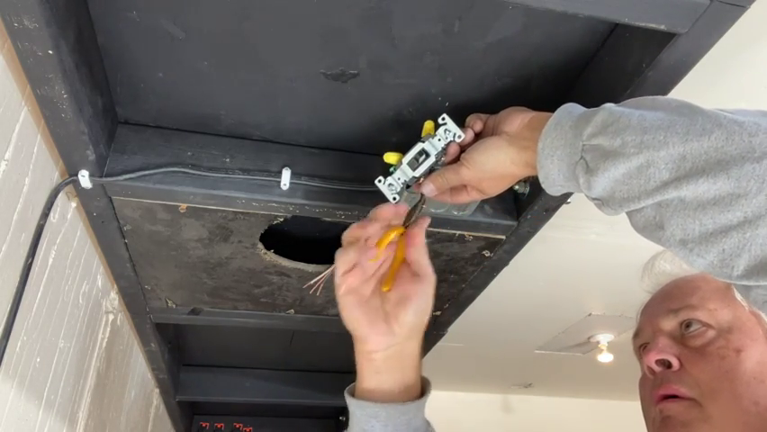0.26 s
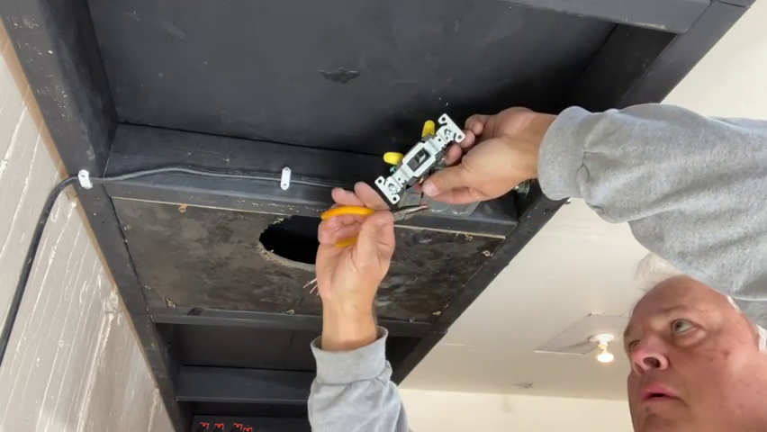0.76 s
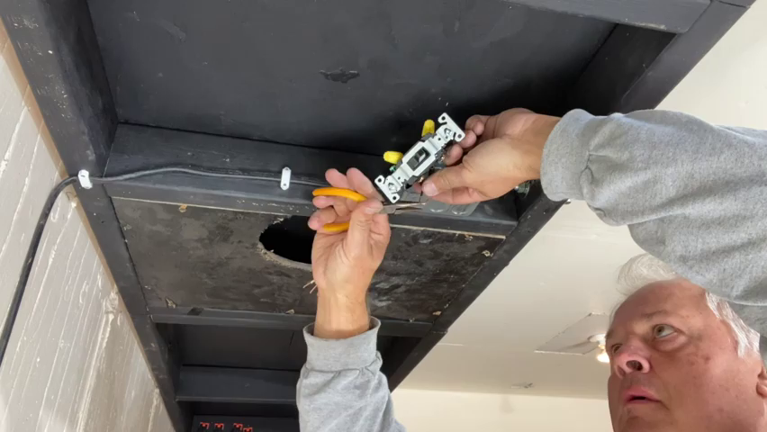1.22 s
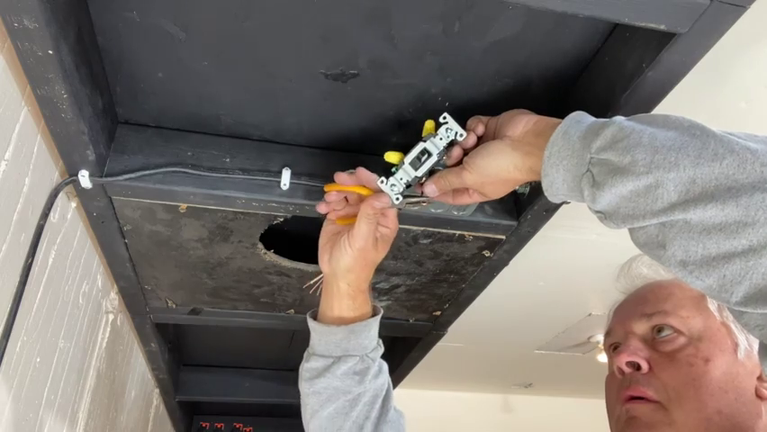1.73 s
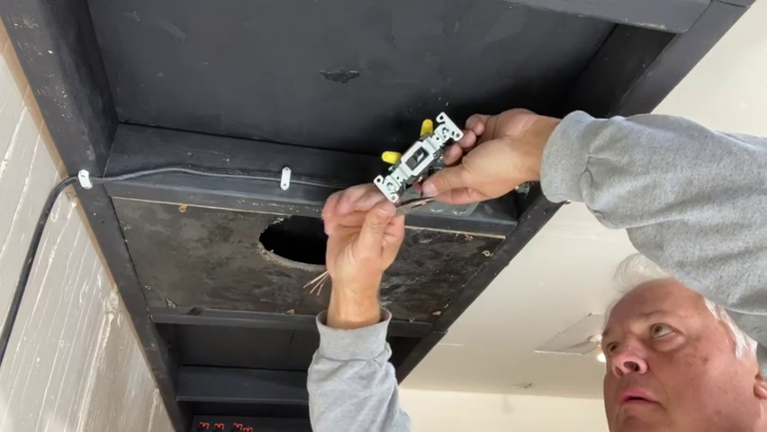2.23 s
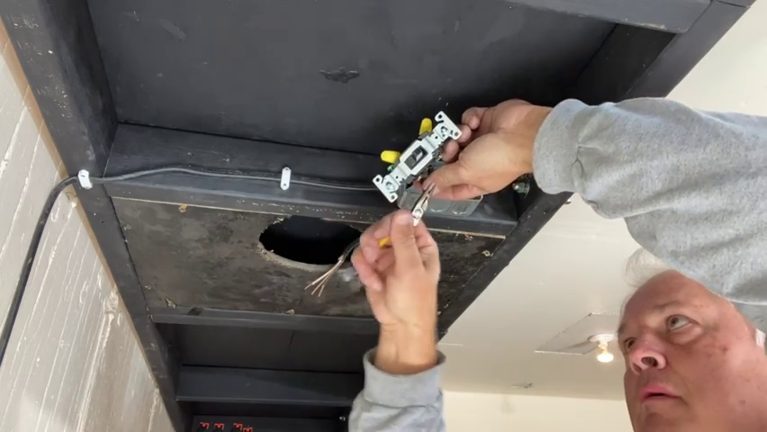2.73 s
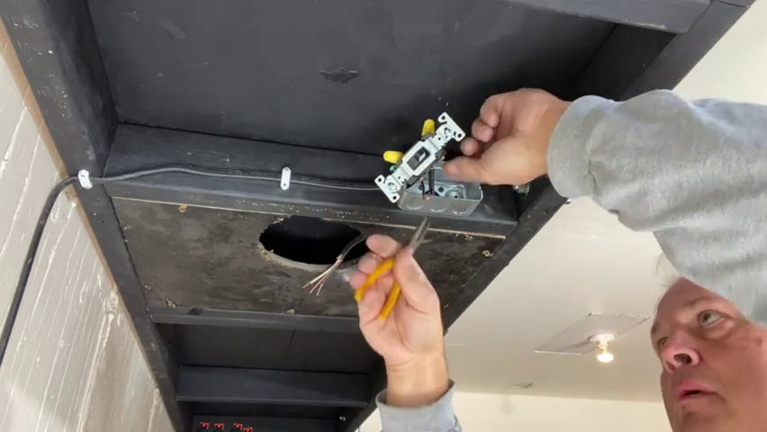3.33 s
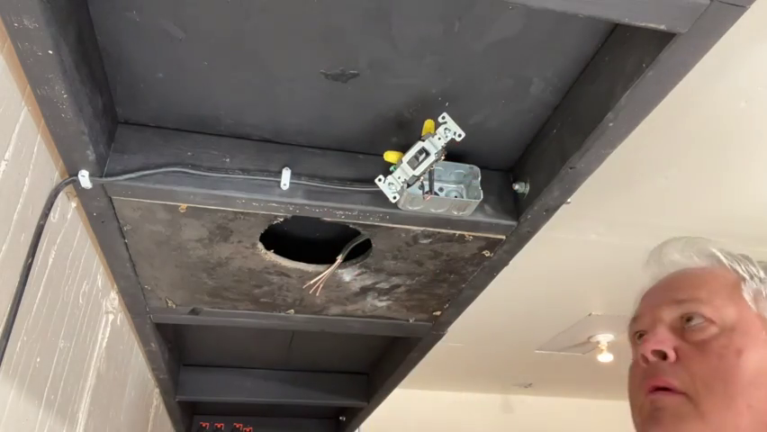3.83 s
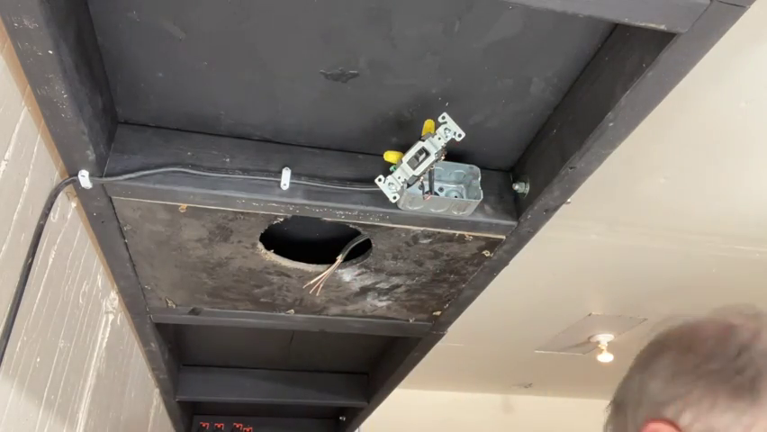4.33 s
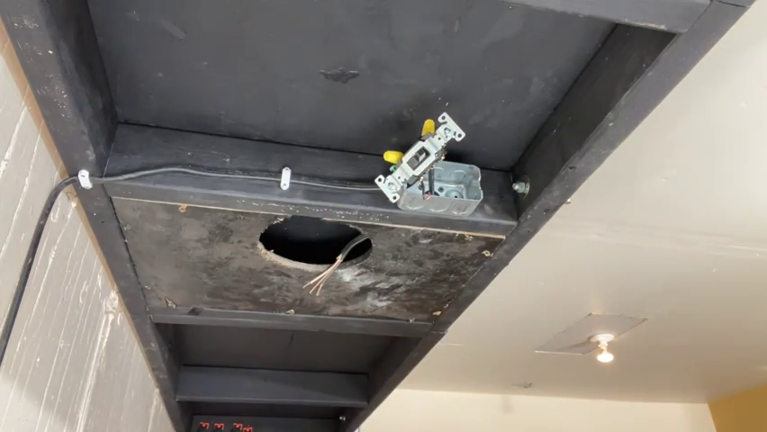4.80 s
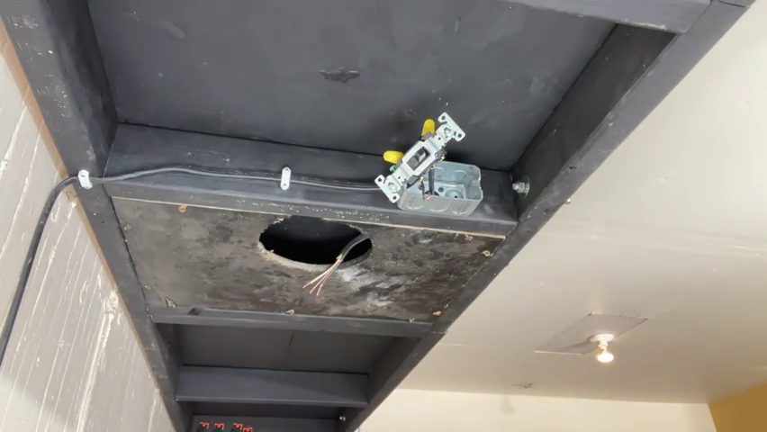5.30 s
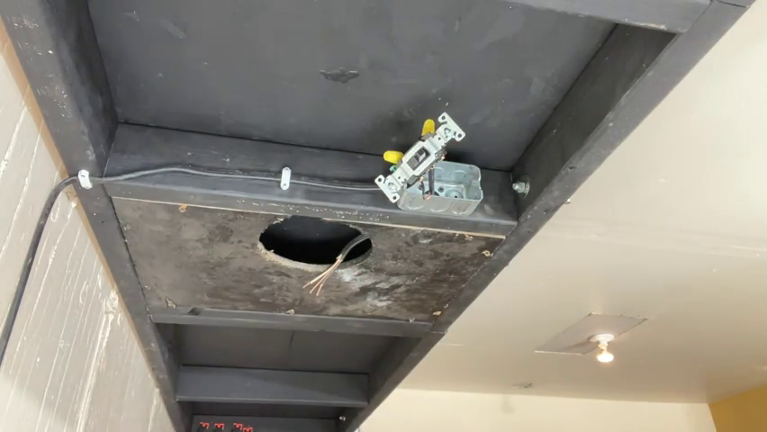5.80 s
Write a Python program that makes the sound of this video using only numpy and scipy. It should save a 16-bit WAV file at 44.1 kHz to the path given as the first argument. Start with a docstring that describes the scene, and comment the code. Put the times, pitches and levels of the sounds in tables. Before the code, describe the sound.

Small clicks and scrapes of wire on a switch, with dull panel thumps, followed by scuffing shoes and a loud hollow clatter indoors.

```python
"""Small ticks, scrapes and clinks: pliers work a copper wire onto the terminals of a light switch.
It hangs from a steel box under a ceiling panel, which thumps when the cable is tugged.
Then shoes and clothes scuff, something squeaks faintly, and across the bare room the tool is put down
on a hollow surface with a loud clatter. A stereo microphone hears the switch with little echo,
the shoes and the rattle with much more, all over the low rumble of a quiet house."""
import sys
import numpy as np
from scipy import signal
from scipy.fft import rfft, irfft, next_fast_len
from scipy.io import wavfile
from scipy.ndimage import uniform_filter1d

SR = 44100
rng = np.random.default_rng(int(sys.argv[2]) if len(sys.argv) > 2 else 0)


def bounce(signal):
    """Save signal as a 16-bit WAV file at the path given by the first command-line argument."""
    frames = np.transpose(np.atleast_2d(signal))
    limited = np.clip(frames, -1, 1)
    pcm = np.round(limited * 32767).astype(np.int16)
    wavfile.write(sys.argv[1], SR, pcm)


N = 266893
SPAN = 32768   # samples given to one event
AGE = np.arange(SPAN) / SR   # seconds since the event began

# Levels in the tables are relative: each source adds its own gain.
# the pliers touch the switch: start_s, tick_db, clink_db, knock_db
TOUCHES = [(0.113, -74, -63, -52), (0.258, -52.5, -53, -35.5), (0.302, -49, -61, -31),
           (0.333, -41.5, -52.5, -40), (0.824, -57, -60.5, -52.5), (0.928, -75, -69, -51),
           (0.992, -46.5, -59, -50), (1.071, -59, -62, -48.5), (1.185, -76, -67.5, -49.5),
           (1.343, -46, -42.5, -44.5), (1.592, -50.5, -61, -53), (1.765, -65, -62.5, -47),
           (1.94, -44.5, -50, -37), (2.178, -63.5, -62, -52), (2.413, -53, -61, -80),
           (2.666, -69, -74.5, -54.5), (2.939, -35, -51, -40.5), (3.020, -30.5, -37.5, -30.5),
           (3.042, -39, -42.5, -48)]
# the wire drags along the terminals: start_s, length_s, level_db, scratch_over_rub_db
DRAGS = [(0.129, 0.25, -54.5, -28), (0.262, 0.12, -41.5, -18.5), (0.984, 0.11, -52, -22.5),
         (1.346, 0.074, -55.5, -16.5), (1.691, 0.19, -53, -44), (1.905, 0.14, -58.5, 13),
         (2.956, 0.13, -44.5, -11.5), (3.031, 0.03, -41.5, -8)]
# modes of the switch frame: pitch_hz, level_db, t60_s
FRAME_MODES = [(1130, -5, .04), (1225, -2, .08), (1320, 0, .05), (1432, -1, .06), (2514, -11, .1),
               (2620, -12, .05), (3068, -16, .05), (3750, -19, .04), (4043, -18, .05)]
# bright spectrum of copper on a screw: frequency_hz, level_db
WIRE_COLOUR = [(300, -45), (1500, 1.5), (2800, 10), (4000, 15), (5200, 16), (6500, 9), (8300, 12.5),
               (11000, 13.5), (16000, -4)]


def switch_clinks(tails, level_db=4.0, ring_db=-0.5, travel_s=0.00195):
    """Each touch travels from the wire to the hand-damped frame, which clinks briefly."""
    # spectrum of the frame's dense modes: frequency_hz, level_db
    clink_colour = [(200, -9), (800, -22.5), (1100, -0.5), (1330, -6), (1650, -18.5), (2100, -11),
                    (2550, -32.5), (3000, -17.5), (3900, -19), (5000, -25), (10000, -58)]
    out = np.zeros((2, N))
    for s, _, db, _ in TOUCHES:
        ring = from_db(ring_db) * struck(FRAME_MODES, vary_db=2.0, spread=.8, detune=.02)
        frame = dense_modes(clink_colour, t60=0.107, rise_s=0.0081) + ring
        add(out, s + travel_s, from_db(db + level_db) * in_room(frame, tails, wet_db=-10.0))
    return out


def wire_ticks(tails, level_db=-6.0, catches_per_s=25, catch_spread_db=2.0):
    """The wire ticks when touched, when it snaps over a screw and when it catches during a drag."""
    # snaps over a screw head: start_s, level_db
    snaps = [(0.282, -46), (0.349, -43.5), (1.906, -52.5), (1.921, -44.5), (1.999, -34.5), (2.012, -41),
             (2.019, -33.5), (2.058, -34.5)]
    ticks = [(s, db) for s, db, _, _ in TOUCHES] + list(snaps)
    for s, length, db, scratch_db in DRAGS:
        waits = rng.uniform(.3, 1.7, 12) / catches_per_s
        levels = db + scratch_db + catch_spread_db * rng.standard_normal(12)
        ticks += [(s + age, level) for age, level in zip(np.cumsum(waits), levels) if age < length]
    crack_and_buzz = fade(.014) + from_db(-14) * fade(.08)
    out = np.zeros((2, N))
    for s, db in ticks:
        tick = noise(varied(WIRE_COLOUR, vary_db=5.5)) * crack_and_buzz
        add(out, s, from_db(db + level_db) * in_room(tick, tails, wet_db=-14.0))
    return out


def wire_scrapes(tails, sing_db=7.5, held_t60_s=.08):
    """Copper drags over the screws in uneven slips; its bright scratch sets the held frame singing."""
    # spectrum of the dull rub: frequency_hz, level_db
    rub_colour = [(40, -40), (130, 10), (300, 11.5), (550, 11), (850, -3.5), (1300, -2.5), (1700, -12.5),
                  (2300, -11.5), (2550, -16), (2850, -19), (4000, -17), (8000, -28)]
    out = np.zeros((2, N))
    for s, length, db, scratch_db in DRAGS:
        stroke = (1 - fade(.015)) * np.sqrt(np.clip(1 - (AGE / length) ** 2, 0, 1))
        slips = grit(rough_db=3.0) * stroke
        scratch = noise(WIRE_COLOUR) * slips
        held_frame = struck(FRAME_MODES, vary_db=0.0, spread=0.91) * fade(held_t60_s)
        singing = signal.fftconvolve(scratch, held_frame, axes=1)[:, :SPAN]
        metal = unit_crest(scratch) + from_db(sing_db) * unit_crest(singing)
        scrape = unit_crest(noise(rub_colour) * slips) + from_db(scratch_db) * metal
        add(out, s, from_db(db) * in_room(scrape, tails, wet_db=-8.5))
    return out


def cable_jolts(travel_s=0.00604, spring_back_s=.027, usual_tug_db=-29, hardening=0.81):
    """Touches, tugs and the cable's soft spring back jolt the panel: start_s, level_db, hardness_db."""
    # the hand tugs the cable: start_s, level_db
    tugs = [(0.123, -34.5), (0.183, -32.5), (0.266, -29), (1.373, -45.5), (1.942, -22.5), (2.031, -42),
            (2.136, -40.5), (2.959, -27)]
    jolts = [(s + travel_s, db + 1.5, -1.5) for s, _, _, db in TOUCHES]
    for s, db in tugs:
        jolts.append((s, db, -14 + hardening * (db - usual_tug_db)))   # a stronger tug is harder
        jolts.append((s + spring_back_s, db - 2.5, -54))
    return jolts


def ceiling_panel(tails, boom_db=-8.0, knock_db=-9.5, ring_db=4.0, softness=0.61):
    """Overhead, the panel booms and knocks at each jolt; a soft one moves mainly a single low mode."""
    # the panel's low and middle modes: pitch_hz, level_db, t60_s
    boom_modes = [(85, -22, .2), (135, 0, .22), (178, -6, .1), (228, 1, .14), (305, -1, .18),
                  (362, -4, .15)]
    knock_modes = [(410, -5, .08), (503, -1, .13), (565, 0, .16), (640, -6, .06), (754, -6, .1),
                   (860, -10, .08)]
    # spectrum of its dense modes: frequency_hz, level_db
    knock_colour = [(100, -16), (220, -3), (380, -7), (560, -5.5), (800, -11), (1100, -29), (2500, -41)]
    main_hz = boom_modes[1][0]
    out = np.zeros((2, N))
    for s, db, hardness_db in cable_jolts():
        modes = favoured(boom_modes, main_hz, slope_db=-softness * hardness_db)
        boom = in_room(struck(modes, vary_db=1.5, spread=.1), tails, wet_db=-14.0)
        wood = dense_modes(knock_colour, t60=0.17, rise_s=0.089)
        ring = from_db(ring_db) * struck(knock_modes, vary_db=1, spread=0.68)
        knock = in_room(wood + ring, tails, wet_db=-9.0)
        add(out, s, from_db(db + boom_db) * boom + from_db(db + hardness_db + knock_db) * knock)
    return out * pan(left_db=1.6)


def tool_blows(other_end_db=-2.5):
    """Each landing is two blows, one per end of the tool: start_s, level_db, rattle_db, pitch_hz."""
    # the tool lands: start_s, level_db, rattle_db, pitch_hz, other_end_after_s
    landings = [(4.084, -51, -63, 850, .02), (4.974, -17, -31.5, 780, .01), (5.003, -10.5, -25, 970, .011),
                (5.085, -13.5, -20, 794, .01), (5.119, -18, -36.5, 450, .008),
                (5.253, -8.5, -27, 734, .005), (5.511, -40.5, -66, 895, .015),
                (5.555, -35.5, -62, 870, .003)]
    for s, db, rattle_db, pitch_hz, gap_s in landings:
        yield s, db, rattle_db, pitch_hz
        yield s + gap_s, db + other_end_db, rattle_db + other_end_db, pitch_hz


def tool_clatter(tails, body_db=-0.5, ring_db=-3.0, usual_blow_db=-14.5, usual_thud_db=-30.5):
    """Across the room the tool lands, tips and settles: the surface rings and thuds, the jaws rattle."""
    # the hollow surface's low and middle modes: pitch_hz, level_db, t60_s
    thud_modes = [(125, -4.5, 0.14), (166, -6, 0.31), (173, 3.5, .1), (200.7, -8.5, 0.32), (232, 12, 0.028),
                  (298, 6, 0.087)]
    ring_modes = [(371, -3, .18), (449, -2, .18), (549, -5, .22), (732, -3, .2), (800, -3, .15),
                  (871, -4, .18), (955, -5, .12), (1225, -11, .13)]
    # spectra of the surface's knock and of the steel jaws: frequency_hz, level_db
    knock_colour = [(30, -66.5), (100, -32), (280, -7.5), (450, 2.5), (620, -11.5), (760, 7.5),
                    (930, -12.5), (1100, -8), (1350, -14.5), (1700, -19.5), (5000, -47)]
    jaw_colour = [(30, -56), (500, -5.5), (1100, 1), (1450, 3.5), (1850, 7.5), (2500, 5.5), (3300, -1),
                  (4300, -4), (5400, -3), (6300, -3.5), (7200, -20), (9000, -10), (11000, -15.5),
                  (16000, -25)]
    out = np.zeros((2, N))
    for s, db, rattle_db, pitch_hz in tool_blows():
        knock = dense_modes(favoured(knock_colour, pitch_hz, slope_db=12.0), t60=.05, rise_s=.006)
        ring = struck(favoured(ring_modes, pitch_hz, slope_db=4.0), vary_db=1.5, spread=.9, detune=.002)
        body = in_room(knock + from_db(ring_db) * ring, tails, wet_db=-6.5, lag_ms=0.25)
        thud = struck(thud_modes, vary_db=1.5, spread=.2) * (1 - fade(.03)) ** 3 * pan(left_db=1.7)
        thud_db = usual_thud_db + 0.78 * (db - usual_blow_db)   # the thud follows the force
        rattle = dense_modes(jaw_colour, t60=.08, rise_s=.007, vary_db=1.5) * grit(rough_db=3.0)
        add(out, s, from_db(db + body_db) * body)
        add(out, s, from_db(thud_db) * in_room(thud, tails, wet_db=-13.5))
        add(out, s, from_db(rattle_db) * in_room(rattle, tails, wet_db=0.0) * pan(left_db=-1.1))
    return out


def shoe_scuffs(tails, level_db=4.5, tilt_db_per_octave=1.2, sole_t60_s=.13, heel_t60_s=.1):
    """The heel taps and the sole rubs the floor: a gritty hiss that swells, holds and dies away."""
    # the shoes meet the floor: start_s, sole_db, rise_s, hold_s, heel_db
    steps = [(3.686, -48.5, 0.004, 0.021, -61), (4.166, -48.5, 0.023, .02, -70),
             (4.312, -47, 0.0051, .015, -66), (4.489, -71.5, 0.0023, .003, -60),
             (4.7763, -52.5, 0.0059, 0.0085, -43.5), (5.469, -60.5, 0.027, .01, -70)]
    # spectrum of shoe on floor, before the tilt: frequency_hz, level_db
    shoe_colour = [(50, -28), (170, -13), (400, -1.5), (900, -3.5), (1300, -2), (1950, 1), (3000, -5.5),
                   (5500, -11), (7200, -26), (9000, -24), (11000, -25.5), (16000, -34)]
    colour = [(hz, db + tilt_db_per_octave * np.log2(hz)) for hz, db in shoe_colour]
    out = np.zeros((2, N))
    for s, sole_db, rise, hold, heel_db in steps:
        release = np.interp(AGE - rise - hold, AGE, fade(sole_t60_s))
        stroke = np.minimum(AGE / rise, 1) * release
        rub = noise(colour) * grit(rough_db=4.5) * stroke
        add(out, s, from_db(sole_db + level_db) * in_room(rub, tails, wet_db=0.5))
        tap = noise(colour) * fade(heel_t60_s)
        add(out, s, from_db(heel_db + level_db) * in_room(tap, tails, wet_db=-8.5))
    return out * pan(left_db=-0.5)


def clothes(level_db=3.5, ease_s=0.044):
    """Cloth slides on cloth: a fine hiss that follows each movement and catches on the folds."""
    # one loudness curve per movement: time_s, level_db
    movements = [
        [(3.6, -77), (3.71, -73), (3.84, -58), (4.182, -77.5), (4.37, -80.5), (4.618, -64.5), (4.836, -55),
         (4.97, -55.5)],
        [(5.78, -82.5), (5.876, -67.5), (6.01, -64), (6.04, -74.5)],
    ]
    # spectrum of the rustle: frequency_hz, level_db
    cloth_colour = [(150, -35.5), (250, -0.5), (414, -0.5), (640, -7), (788, -1.5), (1200, -7), (1530, -1),
                    (2200, -5.5), (2760, -5.5), (4990, -9), (10900, -22.5), (12500, -50.5), (14200, -27),
                    (16000, -37)]
    t, level = np.arange(N) / SR, np.zeros(N)
    for curve in movements:
        s, db = np.transpose(curve)
        outside_s = np.abs(t - np.clip(t, s[0], s[-1]))
        level += from_db(level_db + np.interp(t, s, db)) * np.exp(-outside_s / ease_s)
    folds = grit(rough_db=1.5, size=N, grip_samples=700) * grit(rough_db=2.5, size=N)
    return level * folds * noise(cloth_colour, size=next_fast_len(N))[:, :N]


def squeak(start_s=4.57, length_s=.14, level_db=-75.0, partials_hz=(10000, 11000), arch_hz=300):
    """Something rubs and squeaks thinly: two rough partials swell and sink in pitch and level."""
    arch = np.sin(np.pi * np.minimum(AGE / length_s, 1))
    jitter_hz = 130 * np.log(grit(rough_db=9.0))
    bend_hz = arch_hz * arch + jitter_hz
    tone = sum(np.sin(2 * np.pi * np.cumsum(hz + bend_hz) / SR) for hz in partials_hz)
    out = np.zeros((2, N))
    add(out, start_s, from_db(level_db) * arch * np.array([tone, tone]))
    return out


def room_tone(level_db=-67.3):
    """The steady low rumble of a quiet house."""
    # spectrum of the rumble: frequency_hz, level_db
    rumble_colour = [(20, -9), (70, 0), (130, -2), (290, -10), (430, -15), (950, -18), (1200, -16),
                     (1500, -22), (2000, -22), (3000, -30), (6000, -38), (7300, -43), (9500, -38),
                     (16000, -52)]
    return from_db(level_db) * noise(rumble_colour, size=next_fast_len(N))[:, :N]


def room_tails(count):
    """Spectra of the diffuse echoes from several spots in the room; each octave dies at its own rate."""
    # the bare room's decay: frequency_hz, t60_s
    decay = [(150, 0.47), (700, 0.34), (2500, 0.37), (6000, 0.35), (12000, 0.26)]
    hz = np.fft.rfftfreq(SPAN, 1 / SR)
    octave = np.round(np.log2(np.clip(hz, 128, 16000)))
    build_up = np.clip((AGE - .002) / .004, 0, 1)
    tails = []
    for _ in range(count):
        white = rfft(noise([(1, 0), (SR, 0)]))
        bands = [irfft(white * (octave == k)) * fade(at_hz(decay, 2 ** k)) for k in np.unique(octave)]
        tail = build_up * sum(bands)
        tails.append(rfft(tail / np.sqrt(np.sum(tail ** 2) / 2), 2 * SPAN))
    return tails


def in_room(x, tails, wet_db, lag_ms=0):
    """Direct sound, lag_ms later on the right, plus the echoes of a random spot; loudest moment 1."""
    hz = np.fft.rfftfreq(2 * SPAN, 1 / SR)
    direct = np.exp(-2j * np.pi * hz * np.array([[0], [lag_ms]]) / 1000)
    path = direct + from_db(wet_db) * tails[rng.integers(len(tails))]
    return unit_crest(irfft(rfft(x, 2 * SPAN) * path)[:, :SPAN])


def struck(modes, vary_db, spread, detune=0.019):
    """One blow: each mode varies in strength, detunes with the grip and has its own phase per channel."""
    out = np.zeros((2, SPAN))
    for hz, db, t60 in modes:
        strength, turn, delay, shift = rng.standard_normal(4)
        angle = 2 * np.pi * hz * (1 + detune * shift) * AGE
        phase = np.pi * delay + spread * turn * np.array([[1], [-1]])
        envelope = fade(t60) * (1 - fade(4 / hz))
        out += from_db(db + vary_db * strength) * np.sin(angle + phase) * envelope
    return unit_crest(out)


def dense_modes(colour, t60, rise_s, vary_db=5.5):
    """Modes too many to tell apart: a coloured burst that builds up and dies."""
    return unit_crest(noise(varied(colour, vary_db)) * fade(t60) * (1 - fade(rise_s)))


def varied(colour, vary_db):
    """Each touch falls on another spot, so its colour differs a little."""
    return [(hz, db + vary_db * rng.standard_normal()) for hz, db in colour]


def favoured(table, pitch_hz, slope_db):
    """A blow brings out resonances near one pitch; those an octave or more away lose slope_db."""
    return [(hz, db - slope_db * min(abs(np.log2(hz / pitch_hz)), 1), *rest) for hz, db, *rest in table]


def grit(rough_db, size=SPAN, grip_samples=48):
    """Stick and slip: a gain that wanders to a new random value every grip_samples."""
    knots = np.arange(size // grip_samples + 1) * grip_samples
    return from_db(rough_db * np.interp(np.arange(size), knots, rng.standard_normal(len(knots))))


def noise(colour, size=SPAN):
    """Coloured noise with the stereo width of the room; rms 1."""
    # likeness of left and right at the microphone: frequency_hz, correlation
    likeness = [(130, .97), (210, .75), (350, .15), (1200, -.3), (5500, -.25), (7300, .85), (9000, .95),
                (11500, -.4), (15000, .1)]
    hz = np.fft.rfftfreq(size, 1 / SR)
    alike = at_hz(likeness, hz)
    mid, side = rfft(rng.standard_normal((2, size))) * from_db(at_hz(colour, hz))
    x = irfft(np.sqrt(1 + alike) * mid + np.sqrt(1 - alike) * side * [[1], [-1]], size)
    return x / x.std()


def fade(t60):
    """Envelope that loses 60 dB in t60 seconds."""
    return np.exp(-np.log(1000) * np.minimum(AGE / t60, 10))


def unit_crest(x):
    """Scale so that the loudest 6 ms have rms 1."""
    return x / np.sqrt(uniform_filter1d(np.mean(x ** 2, axis=0), size=264).max())


def at_hz(points, hz):
    """Read a table on a log-frequency axis."""
    points = np.array(points)
    return np.interp(np.log(np.maximum(hz, 1)), np.log(points[:, 0]), points[:, 1])


def from_db(db):
    """Decibels to gain."""
    return 10 ** (np.asarray(db) / 20)


def pan(left_db):
    """Gains that raise the left channel by left_db and lower the right as much."""
    return from_db([[left_db], [-left_db]])


def add(out, s, sound):
    """Mix a sound in at s seconds."""
    start = round(s * SR)
    out[:, start:start + SPAN] += sound[:, :N - start]


def scene():
    """The work at the switch and the movements after it, all in one bare room."""
    tails = room_tails(count=8)
    background = room_tone()
    movement = clothes() + shoe_scuffs(tails) + tool_clatter(tails)
    wiring = ceiling_panel(tails) + wire_scrapes(tails) + switch_clinks(tails) + wire_ticks(tails)
    return wiring + movement + squeak() + background


def record(dry):
    """The microphone loses the deepest bass and has a notch in the high treble; the top is cut."""
    # the microphone's response: frequency_hz, gain_db
    response = [(20, -8), (55, 0), (11400, 0), (12300, -14), (12900, -20), (13700, -2), (14800, 1)]
    size = next_fast_len(N + SPAN)
    gain = from_db(at_hz(response, np.fft.rfftfreq(size, 1 / SR)))
    heard = irfft(rfft(dry, size) * gain, size)[:, :N]
    top_cut = signal.ellip(10, .2, 80, 16100, fs=SR, output="sos")
    return signal.sosfilt(top_cut, heard)


dry = scene()
out = record(dry)
bounce(out)
```